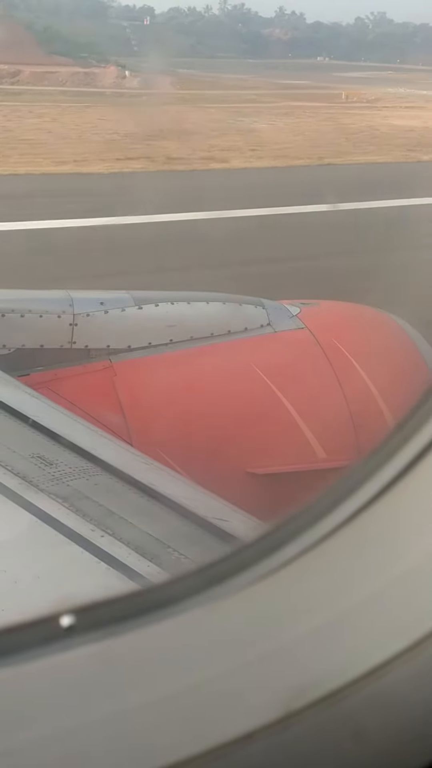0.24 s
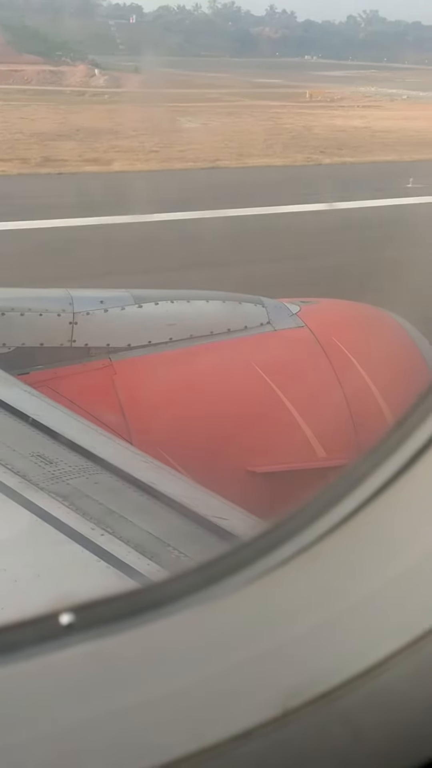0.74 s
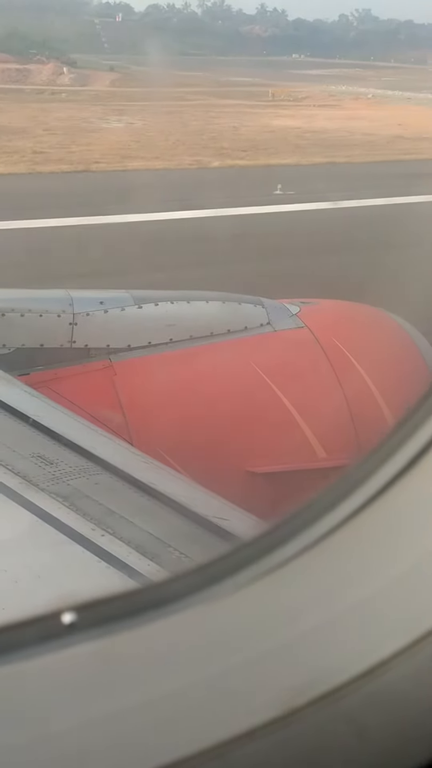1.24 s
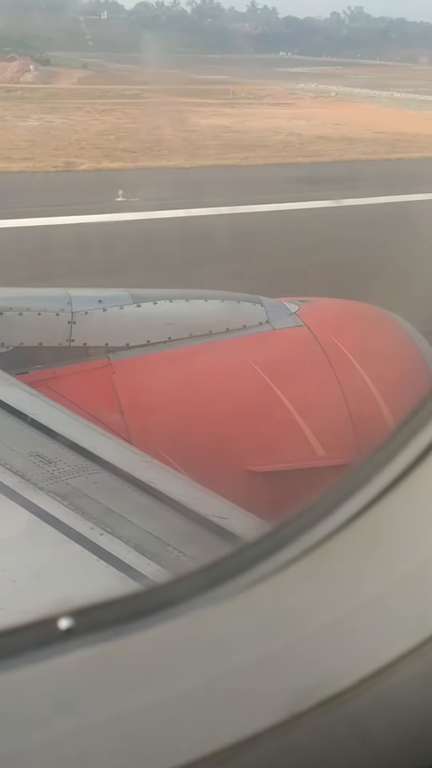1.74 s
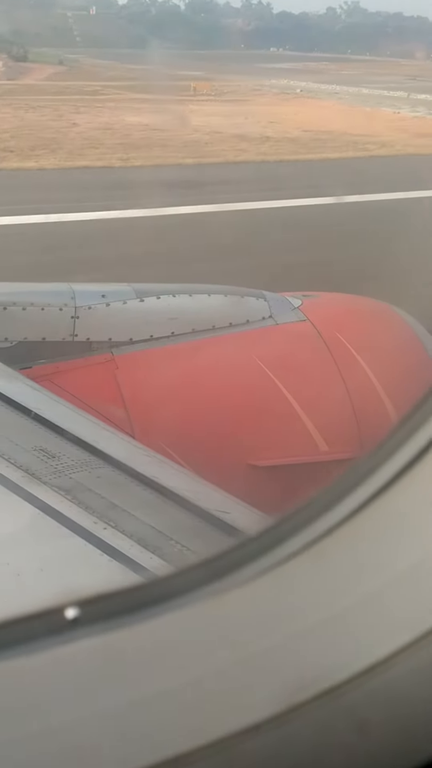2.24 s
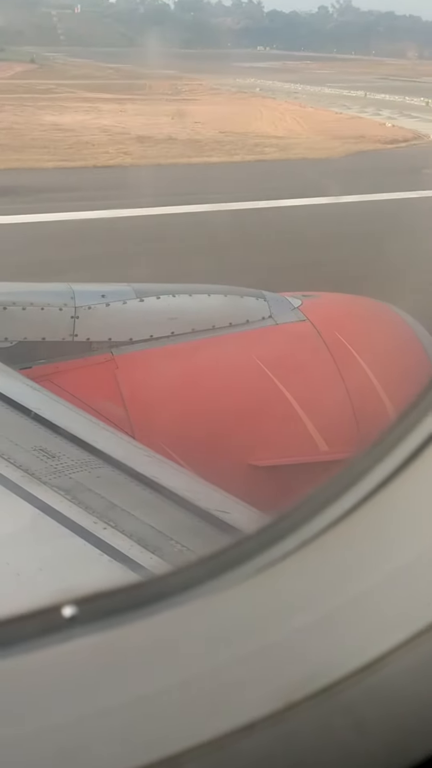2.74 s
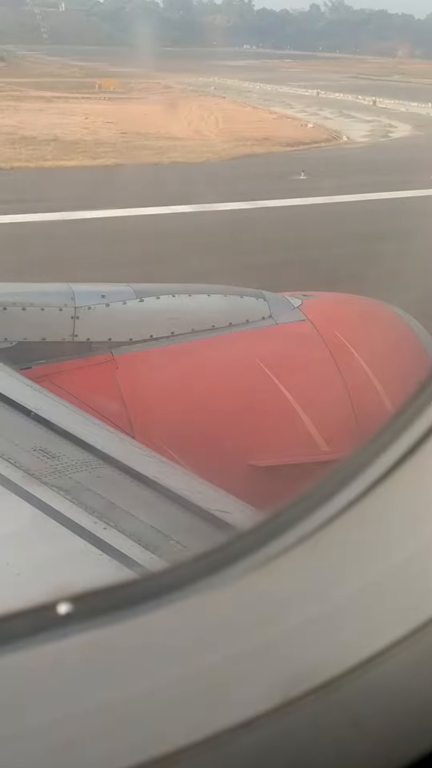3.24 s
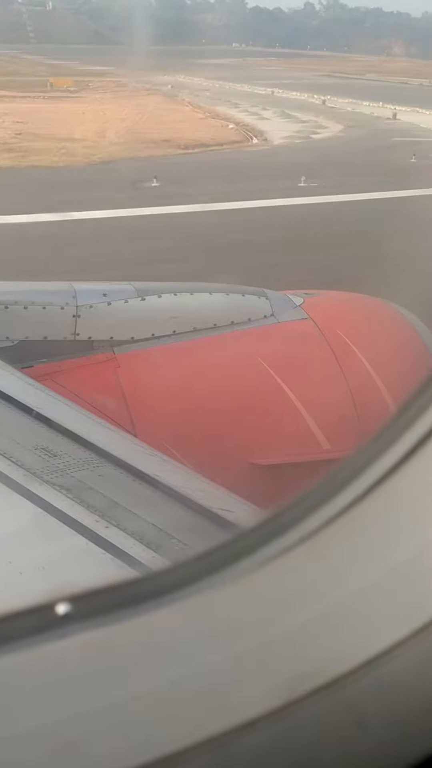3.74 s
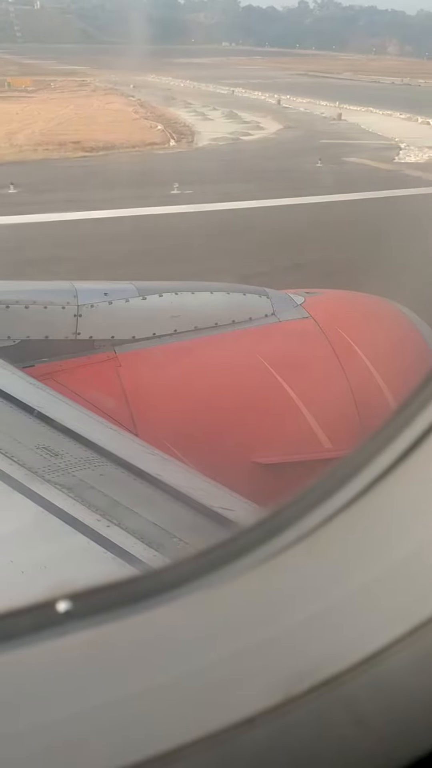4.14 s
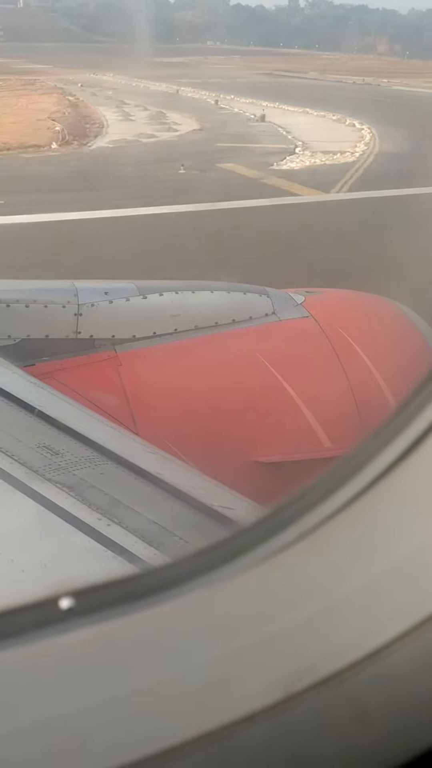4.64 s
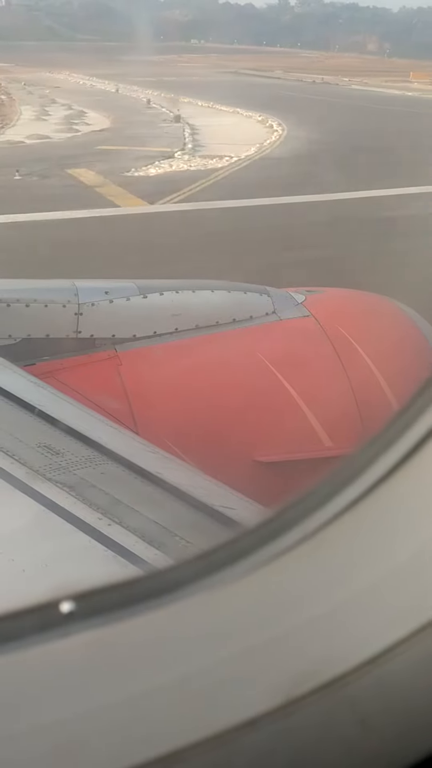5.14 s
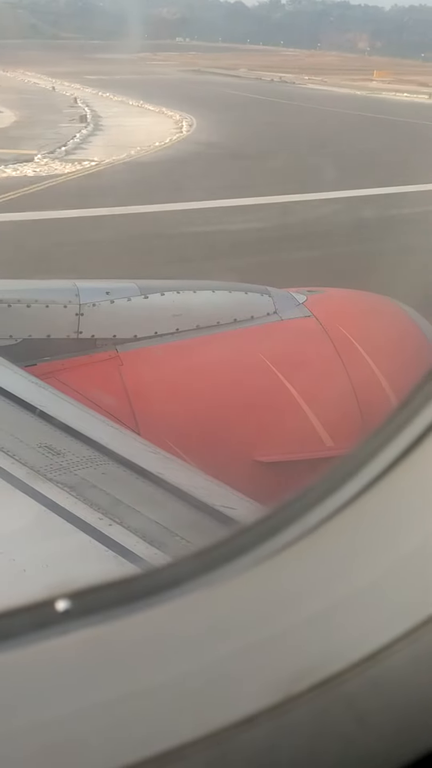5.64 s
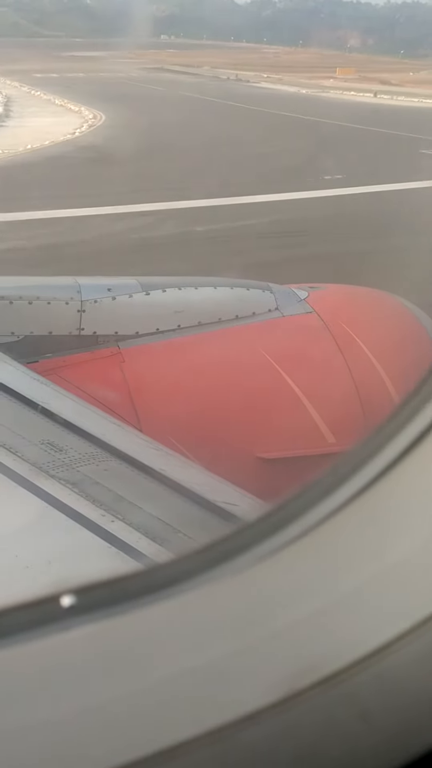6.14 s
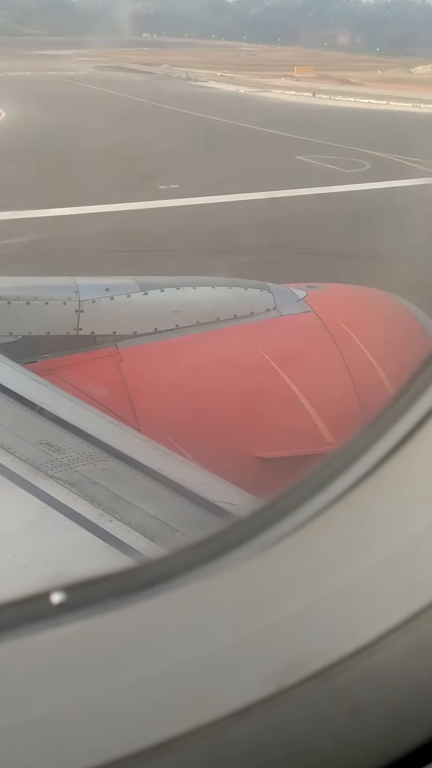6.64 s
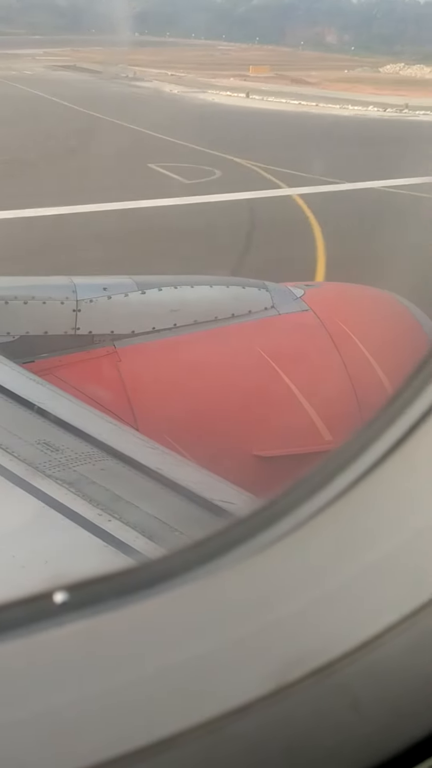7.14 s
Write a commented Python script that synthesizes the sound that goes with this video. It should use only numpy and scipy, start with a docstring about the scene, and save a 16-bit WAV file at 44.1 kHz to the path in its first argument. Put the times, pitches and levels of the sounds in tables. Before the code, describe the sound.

Taxiing jet heard from a window seat: throbbing engine drone gliding down, soft vent hiss, ticking plastic trim, and a falling whine near the end.

```python
"""Both jet engines of a taxiing airliner slowly spool down, heard in the cabin at a window over the wing.
Each shaft drives a hum and gearbox tones, shaped by the airframe; the pairs, a few Hz apart, beat fast.
A wandering sine makes the falling whine, and short sines pass through the drone.
Filtered noise makes the rumble and vent hiss, steady sines the fans,
and short noise bursts the creaks, ticks and knocks of the trim."""
import sys
import numpy as np
from scipy import signal
from scipy.fft import rfft, irfft, next_fast_len
from scipy.io import wavfile

SR = 44100
rng = np.random.default_rng(int(sys.argv[2]) if len(sys.argv) > 2 else 0)


def transcribe(u):
    """Save the signal u as a 16-bit wav file named by the first command-line argument.

    u: samples, shape (n,) or (channels, n), limited to [-1, 1]; the rate is SR.
    q: integer samples, one column per channel.
    """
    v = np.clip(np.atleast_2d(u).T, -1, 1)
    q = np.round(v * 32767).astype(np.int16)
    wavfile.write(sys.argv[1], SR, q)


N = 326781
TIME = np.arange(N) / SR


def amp(db):
    """Decibels to gain."""
    return 10 ** (np.asarray(db) / 20)


def curves(rows):
    """Each column of a time table, at every sample."""
    time_s, *columns = np.transpose(rows)
    return [np.interp(TIME, time_s, column) for column in columns]


def read(points, hz, axis=1):
    """One column of a spectrum table, on a log-frequency axis."""
    table = np.transpose(points)
    return np.interp(np.log(hz + 1), np.log(table[0] + 1), table[axis])


def tint(x, points, axis=1):
    """Filters x by a spectrum in dB."""
    size = next_fast_len(N)
    bins_hz = np.fft.rfftfreq(size, 1 / SR)
    gain = amp(read(points, bins_hz, axis=axis))
    return irfft(rfft(x, size) * gain, size)[..., :N]


def drift(rate_hz):
    """Slow random wandering of rms 1: low-passed noise."""
    knots, knot_rate_hz = 4096, 400
    bins_hz = np.fft.rfftfreq(knots, 1 / knot_rate_hz)
    slow = irfft(rfft(rng.standard_normal(knots)) / (1 + (bins_hz / rate_hz) ** 2))
    return np.interp(TIME, np.arange(knots) / knot_rate_hz, slow / slow.std())


def tone(turns, db, spread_rad=0., waver_db=0.):
    """A sine of rms level db, its level wavering, with a phase spread between two ears."""
    lag = np.array([[spread_rad], [-spread_rad]]) / 2
    level = np.sqrt(2) * amp(db + waver_db * drift(4.9))
    return level * np.sin(2 * np.pi * turns + lag)


def burst(age):
    """Envelope that swells to 1 at half a length, then dies away; age in lengths."""
    return np.sqrt(2 * np.e * age) * np.exp(-age)


# Near engine's shaft speed. Each row: time in seconds, speed in Hz.
SHAFT_SPEED = [(0, 184.1), (1, 179.2), (4, 166.0), (6.3, 155.9), (7.41, 153.0)]
# Far shaft's extra speed, the beat rate of the hums. Each row: time in seconds, difference in Hz.
BEAT_RATE = [(0, 7.0), (2, 6.2), (4.6, 5.8), (5, 6.9), (5.5, 6.3), (6.7, 5.7), (7.41, 3.6)]
# Airframe response to the hum, a broad resonance under a sharp notch. Each row: shaft Hz, level in dB.
HUM_PATH_DB = [(153, -27), (154.2, -21), (163.5, -19.8), (167, -15.3), (171.3, -17.2), (172.5, -21.5),
               (173.1, -45), (173.8, -29.5), (176.3, -26), (177.9, -28), (179.3, -34.5), (184, -41)]
# Airframe response to the gearbox tone. Each row: tone Hz, near level in dB, far level in dB.
GEAR_PATH_DB = [(352, -38, -34), (362, -44, -35), (378, -60, -39.5), (387, -39.5, -42), (392, -47, -39),
                (401, -37.5, -37.5), (409, -43, -32.5), (422, -33, -38), (431, -37, -42), (435, -37, -58)]
# Airframe response to its octave. Each row: octave Hz, near level in dB, far level in dB.
OCTAVE_PATH_DB = [(705, -57, -56), (718, -62, -56), (728, -53, -57), (746, -62, -50), (762, -58, -58),
                  (781, -62, -55), (795, -64, -67), (843, -53, -64), (880, -60, -66)]
# Airframe response to its fourth multiple, both engines. Each row: tone Hz, level in dB.
FOURTH_PATH_DB = [(1420, -68), (1490, -65.5), (1560, -72), (1750, -76)]
OPPOSED_AT_S = 5.325  # the two hums are half a turn apart
GEAR_RATIO = 2.303  # gearbox tone per shaft turn
# The far hum gets through best near one frequency, fading to a floor on either side.
FAR_BEST_HZ, FAR_WIDTH_HZ = 164, 5.9
FAR_BEST_DB, FAR_FLOOR_DB = -2.5, -18.5
# Offsets on the path levels: (gearbox tone, octave).
NEAR_GEAR_DB, FAR_GEAR_DB = (-0.56, -0.4), (-0.2, 0.2)


def engines():
    """Two slowing shafts, a few Hz apart, beat, and swell as they cross the airframe's resonances."""
    [near_hz], [beat_hz] = curves(SHAFT_SPEED), curves(BEAT_RATE)
    far_hz = near_hz + beat_hz
    near_turns, lead_turns = np.cumsum(near_hz) / SR, np.cumsum(beat_hz) / SR
    far_turns = near_turns + lead_turns - np.interp(OPPOSED_AT_S, TIME, lead_turns) + .5
    far_peak = np.exp(-((far_hz - FAR_BEST_HZ) / FAR_WIDTH_HZ) ** 2)
    far_db = FAR_FLOOR_DB + (FAR_BEST_DB - FAR_FLOOR_DB) * far_peak
    shafts = [(near_turns, near_hz, 0, *NEAR_GEAR_DB), (far_turns, far_hz, far_db, *FAR_GEAR_DB)]
    out = np.zeros((2, N))
    for column, (turns, hz, hum_db, gear_db, octave_db) in enumerate(shafts, 1):
        gear, gear_hz = GEAR_RATIO * turns, GEAR_RATIO * hz
        hum_db = hum_db + read(HUM_PATH_DB, hz)
        gear_db = gear_db + read(GEAR_PATH_DB, gear_hz, axis=column)
        octave_db = octave_db + read(OCTAVE_PATH_DB, 2 * gear_hz, axis=column)
        fourth_db = read(FOURTH_PATH_DB, 4 * gear_hz)
        out += tone(turns, hum_db, spread_rad=.12, waver_db=.15) * amp([[-.6], [.5]])
        out += tone(gear, gear_db, spread_rad=.67, waver_db=1.5)
        out += tone(2 * gear, octave_db, spread_rad=.7, waver_db=2.5) * amp([[1.5], [-1.5]])
        out += tone(4 * gear, fourth_db, spread_rad=.89, waver_db=.5)
    return out


# Whine sinking ever faster as the aircraft slows.
# Each row: time in seconds, pitch in Hz, level in dB before ear balance.
WHINE_GLIDE = [(0, 598, -48.5), (2.4, 588, -50), (4.1, 571, -51), (6.25, 510, -57), (6.42, 495, -43),
               (6.7, 466, -47), (6.87, 450, -38.5), (7.15, 422, -34), (7.41, 398, -36.5)]
WANDER_HZ, WANDER_HZ_PER_HZ_FALLEN = .4, .006


def whine():
    """A sinking tone whose pitch grows unsteady as it falls."""
    hz, db = curves(WHINE_GLIDE)
    unsteady_hz = WANDER_HZ + WANDER_HZ_PER_HZ_FALLEN * (hz[0] - hz)
    turns = np.cumsum(hz + unsteady_hz * drift(15)) / SR
    return tone(turns, db, spread_rad=.5, waver_db=1.2) * amp([[1.1], [-1.1]])


# Brief tones and low hull booms that surface from the drone.
# Each row: start in seconds, end in seconds, start Hz, end Hz, level at mid-way in dB.
PASSING_GLIDES = [(0, .8, 191, 188, -37), (0, 1.7, 169, 166, -35.5), (0, 2.4, 1820, 1780, -64.5),
                  (.9, 3.4, 291, 285, -40.5), (3.4, 6.4, 90, 90, -39), (3.9, 5.1, 331, 324.6, -37.5),
                  (4.1, 5, 540, 520, -54), (5.1, 5.6, 452, 429, -42), (6.3, 7.41, 334, 305.5, -38.5),
                  (6.55, 7.2, 90, 90, -33)]


def passing_tones():
    """Short glides and booms: sines that fade in and out."""
    out = np.zeros((2, N))
    for start_s, end_s, start_hz, end_hz, db in PASSING_GLIDES:
        progress = np.clip((TIME - start_s) / (end_s - start_s), 0, 1)
        fade = 2 * np.sqrt(progress * (1 - progress))
        hz = start_hz + (end_hz - start_hz) * progress + .71 * drift(4.7)
        out += fade * tone(np.cumsum(hz) / SR, db, spread_rad=.16, waver_db=2.3)
    return out


# Correlation between the ears, negative where opposed. Each row: frequency in Hz, correlation -1 to 1.
EAR_LIKENESS = [(60, 1), (160, 0.92), (260, 0.9), (420, 0.94), (650, 0.0099), (1050, -0.53), (1700, -0.35),
                (2700, 0.14), (11000, -0.073)]


def noise_pair():
    """White noise of 0 dB per Hz at two ears: alike in the bass, partly opposed or unrelated above."""
    size = next_fast_len(N)
    first, second = rfft(rng.standard_normal((2, size)))
    same = np.clip(read(EAR_LIKENESS, np.fft.rfftfreq(size, 1 / SR)), -1, 1)
    right = same * first + np.sqrt(1 - same ** 2) * second
    return irfft(np.array([first, right]), size)[:, :N] * np.sqrt(SR / 2)


# Wheel and engine roar through the hull, before easing. Each row: frequency in Hz, density in dB per Hz.
RUMBLE_SPECTRUM = [(15, -77), (25, -67), (40, -58.5), (60, -51), (88, -54.5), (120, -52.5), (200, -54),
                   (290, -55), (360, -59.5), (460, -63.5), (560, -69.5), (640, -75.5), (850, -79),
                   (1150, -91.5), (2500, -110)]
# Air flow easing with the engines; each layer scales it. Each row: time in seconds, unscaled dB.
FLOW_EASING = [(0, -0.5), (1.5, -0.45), (3, -1), (4, -1.35), (5, -3.5), (6, -4.5), (7.41, -6)]


def rumble():
    """Low roar of wheels and exhaust, swaying gently; the upper part eases with the engines."""
    [flow_db] = curves(FLOW_EASING)
    roar = tint(noise_pair(), RUMBLE_SPECTRUM)
    wheels = signal.sosfiltfilt(signal.butter(2, 170, fs=SR, output="sos"), roar)
    exhaust = (roar - wheels) * amp(.53 * flow_db + .34)
    sway_db = .5 * drift(3.2) + np.array([[-.3], [.3]])
    return (wheels + exhaust) * amp(sway_db)


# Vent hiss before easing. Each row: frequency in Hz, left density in dB per Hz, right density in dB per Hz.
VENT_SPECTRUM = [(397, -78.5, -90.5), (770, -74.5, -81.5), (1430, -82, -82), (1970, -76.5, -82),
                 (2470, -79.5, -87.5), (3500, -77, -90), (4065, -73.5, -87), (5000, -83.5, -94.5),
                 (6400, -97.5, -95.5), (8000, -103, -90.5), (9070, -99, -84.5), (10100, -104, -90.5),
                 (11400, -99, -93.5), (12200, -101, -99.5)]


def vents():
    """Hiss of the cabin air; its top fades faster than its body when the flow eases."""
    [flow_db] = curves(FLOW_EASING)
    left, right = noise_pair()
    air = np.array([tint(left, VENT_SPECTRUM, axis=1), tint(right, VENT_SPECTRUM, axis=2)])
    body = signal.sosfiltfilt(signal.butter(2, 2800, fs=SR, output="sos"), air)
    body_db = .41 * flow_db + .87 * drift(8.7)
    top_db = 1.86 * flow_db + .5 * drift(13)
    return body * amp(body_db) + (air - body) * amp(top_db)


def cabin(x, echo_db=-10.5, count=8):
    """Reflections 1 to 20 ms off wall, seats and ceiling ripple the spectrum, differently at each ear."""
    out = x.copy()
    echo_gain = amp(echo_db) / np.sqrt(count)
    for ear in range(2):
        for delay in rng.integers(SR // 1000, SR // 50, count):
            sign = rng.choice([-1, 1])
            out[ear] += sign * echo_gain * np.roll(x[ear], delay)
    return out


# Cabin fans and electrics.
# Each row: pitch in Hz, left level in dB, right level in dB, phase between the ears in radians.
FAN_TONES = [(504.5, -50, -50, .4), (842.5, -57, -63, -2.6), (914.5, -63, -56, -2.3),
             (1009, -62, -61, -1.3), (1041, -65, -69, 1.5), (1317, -67, -71, 2), (1388, -71, -73, 2),
             (2690, -65, -74, 1.5), (2777, -67, -73, 1.5), (4048, -68, -78, 1.5), (6428, -80, -84, 1)]


def fans():
    """Steady machine tones, each wavering a little in pitch and level."""
    out = np.zeros((2, N))
    for hz, left_db, right_db, phase_rad in FAN_TONES:
        turns = np.cumsum(hz + 1.2 * drift(4)) / SR
        out += tone(turns, 0, spread_rad=phase_rad, waver_db=2.2) * amp([[left_db], [right_db]])
    return out


# Louder creaks, levels before ear balance.
# Each row: start in seconds, length in seconds, body level in dB, fizz level in dB.
CREAK_EVENTS = [(1.121, 0.0067, -36.5, -42.5), (2.51, 0.0089, -37, -36), (3.801, 0.0035, -42, -46),
                (4.185, .02, -43.5, -47.5), (4.317, .004, -43, -45), (4.451, 0.011, -44, -47),
                (4.531, .005, -37.5, -56), (4.669, .015, -55, -43.5), (5.23, .0074, -42.5, -48),
                (5.453, .012, -43.5, -44.5), (5.53, .0045, -43, -48), (5.575, 0.0034, -44, -44),
                (5.613, 0.0088, -28, -38.5), (5.624, 0.022, -40, -52), (6.346, 0.011, -43, -51),
                (6.634, .007, -39.5, -53), (7.157, .005, -46, -53), (7.197, .0097, -53, -48)]


def slips(db_column, colour):
    """Stick-slip grit: noise of jumping level, in one colour, in bursts that swell and die."""
    force = np.zeros(N)
    for (start_s, length_s, *_), db in zip(CREAK_EVENTS, db_column):
        start = round(start_s * SR)
        age = np.maximum(TIME[start:][:SR // 4] - start_s, 0) / max(length_s, .001)
        force[start:][:len(age)] += amp(db) * burst(age)
    # one random level per 32 samples
    grains = np.repeat(amp(1.5 * rng.standard_normal(N // 32 + 1)), 32)[:N]
    grit = tint(rng.standard_normal((2, N)) * grains, colour)
    return force * grit / grit.std()


# Colour of a creak's body. Each row: frequency in Hz, relative level in dB.
BODY_COLOUR = [(1200, -22), (2500, -14.5), (2950, 4.5), (4500, 2), (5600, -6), (6800, -15.5), (7500, -24),
               (12000, -26.5)]
# Colour of a creak's fizz, and of the ticks. Each row: frequency in Hz, relative level in dB.
FIZZ_COLOUR = [(3000, -16.5), (6000, -6.5), (8000, -1.5), (9400, 2), (11000, -11), (12000, -5.5)]


def trim():
    """Plastic panels creak as the hull flexes: the body sounds to the left, the fizz to the right."""
    _, _, body_db, fizz_db = np.transpose(CREAK_EVENTS)
    body = slips(body_db, BODY_COLOUR) * amp([[.1], [-13]])
    fizz = slips(fizz_db, FIZZ_COLOUR) * amp([[-9], [.1]])
    return body + fizz


def faint_ticks(per_s=4.9, tick_db=-47.0, ring_s=.004):
    """The panels tick softly at random moments: decaying noise; tick_db is before ear balance."""
    slip = (rng.random(N) < per_s / SR) * rng.uniform(.3, 1, N)
    force = signal.lfilter([1], [1, -np.exp(-1 / (ring_s * SR))], slip)
    grit = tint(rng.standard_normal((2, N)), FIZZ_COLOUR)
    return amp(tick_db) * force * grit / grit.std() * amp([[-5], [2.5]])


# Knocks and rattles of loose fittings.
# Each row: start in seconds, resonance in Hz, length in seconds, level in dB, left minus right in dB.
KNOCK_EVENTS = [(4.182, 760, .016, -39, 0), (4.445, 940, .014, -42, 0), (4.531, 1900, .005, -46, 2),
                (5.222, 740, .014, -44, 0), (6.635, 2100, .008, -51, 4), (6.886, 2400, .004, -45, 6),
                (6.975, 2700, .005, -47, 6), (7.191, 3300, .01, -46, 8), (7.272, 3100, .022, -49, 8),
                (7.362, 3700, .007, -47, 8)]


def knocks():
    """Each loose fitting rattles briefly: a noise burst in one broad resonance."""
    out = np.zeros((2, N))
    for start_s, hz, length_s, db, pan_db in KNOCK_EVENTS:
        ring = signal.lfilter(*signal.iirpeak(hz, 5, SR), rng.standard_normal((2, N)))
        age = np.clip((TIME - start_s) / length_s, 0, 20)
        ear_db = db + pan_db * np.array([[.5], [-.5]])
        out += amp(ear_db) * burst(age) * ring / ring.std()
    return out


def scene():
    """Everything heard at the window seat."""
    machines = engines() + whine() + passing_tones() + fans()
    air = rumble() + cabin(vents())
    fittings = trim() + faint_ticks() + knocks()
    return machines + air + fittings


EDGE_HZ = 12080


def record(dry):
    """Band limit: a steep linear-phase low-pass."""
    lowpass = signal.firwin(1023, EDGE_HZ, window=("kaiser", 9), fs=SR)
    return signal.oaconvolve(dry, lowpass[None], "same")


dry = scene()
out = record(dry)
transcribe(out)
```